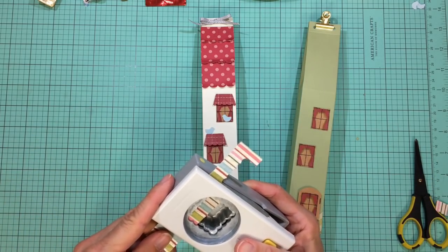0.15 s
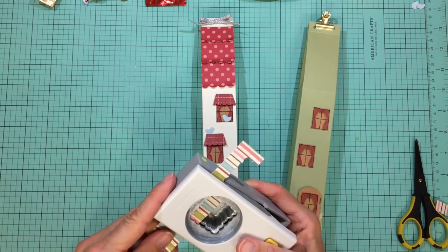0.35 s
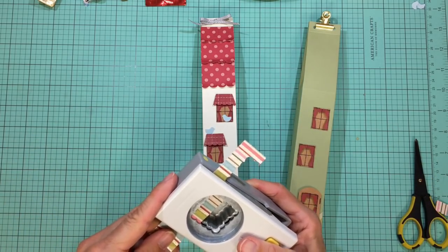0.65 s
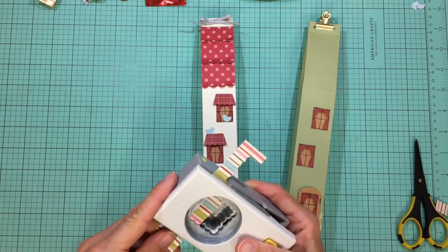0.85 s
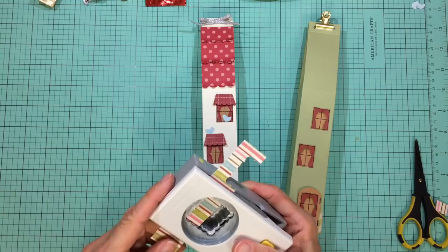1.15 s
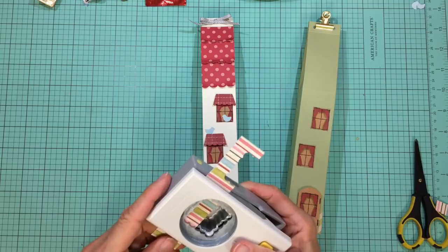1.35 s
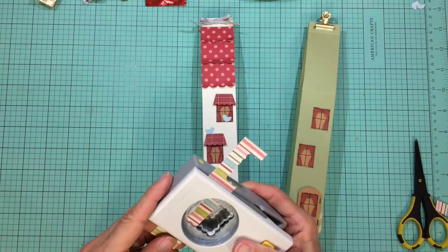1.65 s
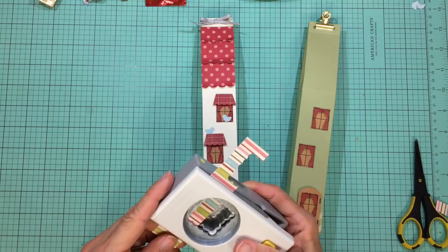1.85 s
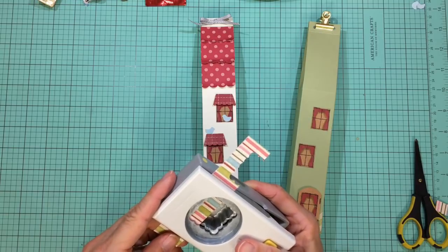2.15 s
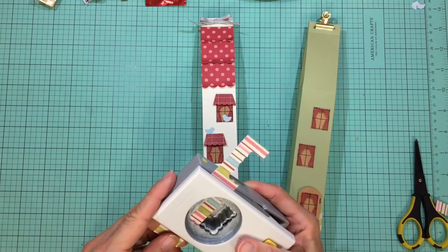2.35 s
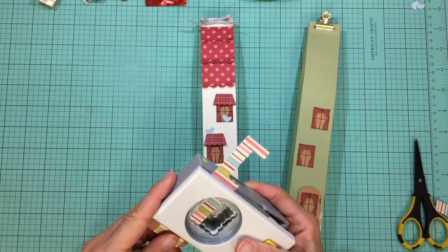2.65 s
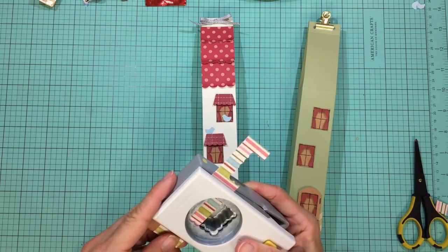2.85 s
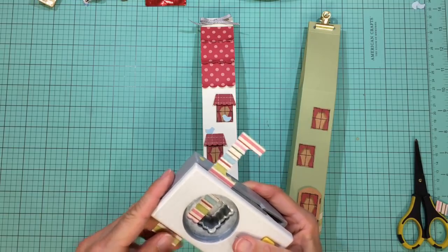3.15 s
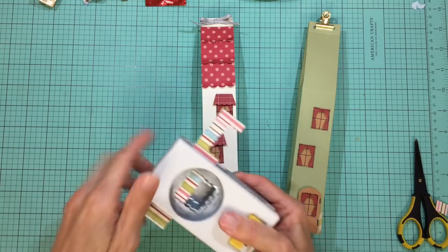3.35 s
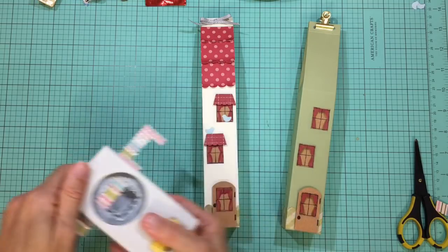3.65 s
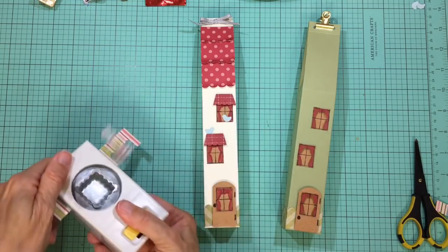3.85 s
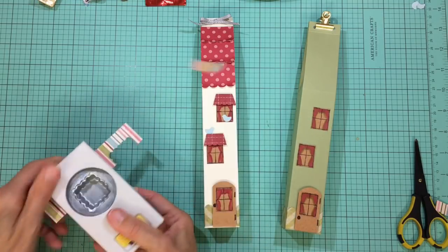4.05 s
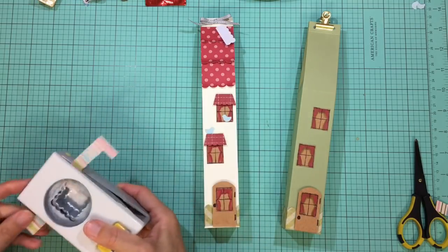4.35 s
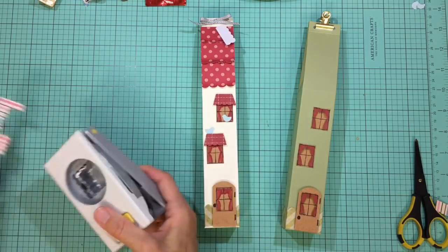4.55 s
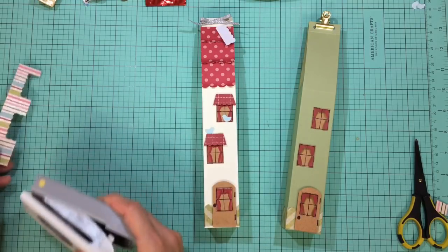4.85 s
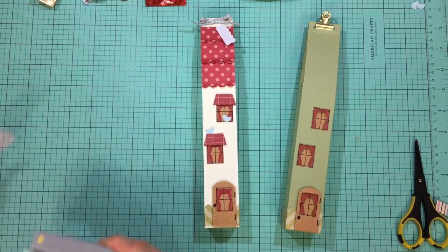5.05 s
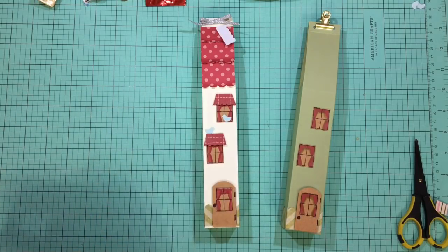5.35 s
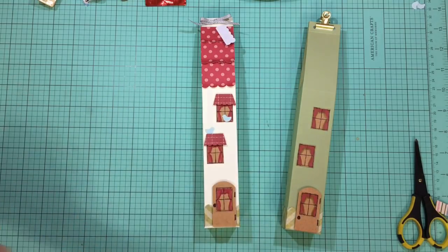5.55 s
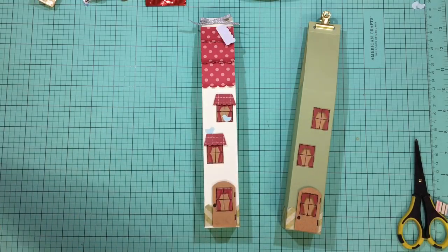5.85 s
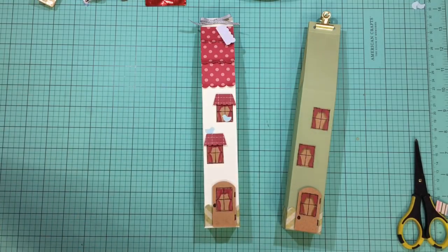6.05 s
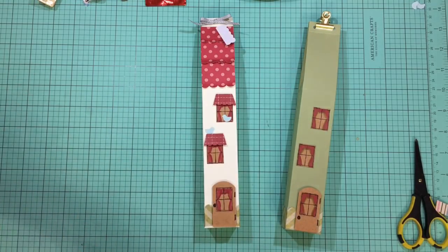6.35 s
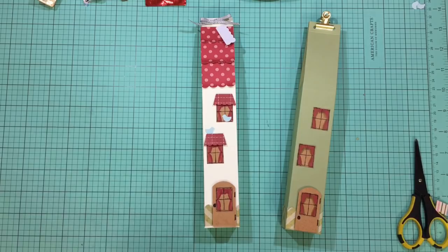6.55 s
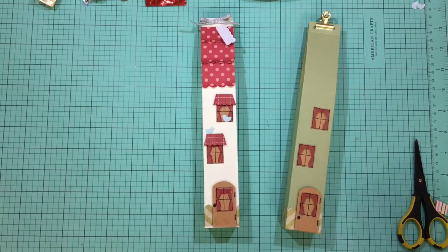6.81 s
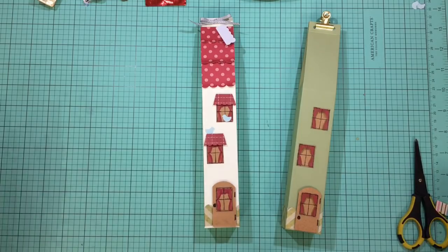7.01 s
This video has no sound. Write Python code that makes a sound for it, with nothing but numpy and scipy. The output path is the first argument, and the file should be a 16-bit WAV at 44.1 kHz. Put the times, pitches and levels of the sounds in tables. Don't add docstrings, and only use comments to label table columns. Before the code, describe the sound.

A craft punch rustles and creaks quietly in the hands, crunches and snaps sharply through card, then is set down with hollow wooden knocks.

```python
import sys
import numpy as np
from scipy import signal
from scipy.fft import rfft, irfft, next_fast_len
from scipy.io import wavfile
from scipy.ndimage import uniform_filter1d

SR = 44100
rng = np.random.default_rng(int(sys.argv[2]) if len(sys.argv) > 2 else 0)


def nominal_scale(level):
    x = np.asarray(level, float) / 20
    return 10 ** x


def transcribe(u):
    v = np.clip(np.atleast_2d(u).T, -1, 1)
    q = np.round(v * 32767).astype(np.int16)
    wavfile.write(sys.argv[1], SR, q)


N = 316505


# (pitch [Hz], level [dB])
AIR = [(12, -65), (20, -38), (36, -15.5), (60, 1), (82, -13), (117, -5.5), (244, -20.5), (297, -21),
       (566, -28), (690, -29), (1280, -31), (1390, -33), (2890, -35.5), (12500, -42.5), (16500, -47.5)]
# (pitch [Hz], rms level [dB])
WHINES = [(1248, -81), (1308, -81)]
# (pitch [Hz], width [Hz], rms level [dB])
DRONES = [(51.5, 6.1, -69.5), (119, 10, -71.5), (243.3, 35, -74)]
# (pitch [Hz], t60 [s])
ROOM_DECAY = [(150, 0.52), (600, 0.2), (2000, 0.23), (5000, 0.18), (12000, 0.17)]
# (delay [ms], level [dB])
ECHOES = [(2.1, -9.5), (4.4, 0), (6.3, -42), (8.3, -0.5), (11.5, -28.5), (16, -27), (23.5, -25)]

# (pitch [Hz], level [dB], t60 [s])
DEEP = [(110.4, -2, 0.37), (144.5, -1.5, 0.15)]
# (pitch [Hz], level [dB], t60 [s])
MIDDLE = [(182.7, -2.5, 0.1), (244, 2.5, 0.039)]
# (pitch [Hz], level [dB], t60 [s])
EDGE = [(358.3, -4, 0.051), (432.3, 0.5, 0.059)]
# (pitch [Hz], level [dB], t60 [s])
PANEL = [(702.5, 3, 0.083), (833, -12, .02), (927, 6, 0.039), (1050, -2, 0.049), (1110, 1, 0.04)]
# (pitch [Hz], level [dB], t60 [s])
RATTLE = [(1668, -7, 0.018), (1728, -3, 0.036), (1966, -3.5, .02), (2130, -3.5, .02), (2263, 5, .014),
          (2510, 0, 0.025), (2915, -1, 0.017), (3280, 0, .014), (3300, -30, .02)]
# (pitch [Hz], level [dB], t60 [s])
TICK = [(4495, -11.5, .012), (5320, -4, 0.013), (5900, -4, 0.0077), (6490, 0.5, 0.0064), (7200, 17, 0.0013),
        (9350, 4, .002), (11800, -11, .002)]
# (peak [s], rise [s], fall [s], level [dB])
SHAKES = [
    (4.0, 0.011, 0.025, -47.5),
    (4.072, 0.033, 0.052, -55),
    (4.269, 0.022, 0.21, -47.5),
    (6.4, 0.0048, 0.12, -46.5),
    (6.563, 0.16, 0.28, -44),
    (6.672, 0.19, 0.17, -49),
    (7.17, 0.053, 0.19, -64),
]
# (time [s], deep [dB], middle [dB], edge [dB], contact [ms])
THUMPS = [(5.537, -64.5, -48.5, -43.5, 1.2), (5.877, -45, -35, -41, 2), (5.8811, -20, -19, -25.5, 2.26),
          (5.97, -31, -36, -27.5, 1.9), (5.9734, -34, -20, -23.5, 1.33), (6.0204, -45, -47, -49, 2.3),
          (6.088, -49, -34.5, -55, 3), (6.146, -52, -60, -65, 3.2), (6.306, -37.5, -31.5, -37, 2.2),
          (6.3106, -41.5, -29, -33, 1.6), (6.3249, -48, -25.5, -30, 1.26), (6.392, -42, -30.5, -34, 1.6),
          (6.446, -51, -49, -42, 2), (6.479, -49, -33, -43.5, 1.35), (6.548, -46, -37.5, -49, 2.5),
          (6.605, -45, -40.5, -47, 2.2), (6.664, -42.5, -45.5, -52.5, 2.7), (6.966, -66, -66, -61, 2.6)]
# (time [s], panel [dB], rattle [dB], tick [dB], contact rise [ms])
KNOCKS = [(5.538, -36, -52, -76, 4), (5.879, -29.5, -40.5, -49, 2.96), (5.885, -34, -43.5, -62, 2.4),
          (5.972, -25, -30.5, -39, 1.14), (5.978, -31, -38.5, -65, 1.8), (6.0185, -25, -34, -36.5, 1.5),
          (6.027, -28.5, -32, -48, 4.16), (6.07, -33, -39, -58, 2.7), (6.09, -49, -44.5, -70, 2.7),
          (6.148, -58.5, -45, -55, 1.9), (6.306, -34.5, -40, -49.5, 1.1), (6.311, -36.5, -46, -63.5, 2.6),
          (6.3245, -22.5, -16.5, -24, .6), (6.332, -28.5, -36, -40, 2.3), (6.34, -33, -35, -57, 1.6),
          (6.394, -43, -60, -80, 1.9), (6.478, -47.5, -69.5, -87.5, 2.7), (6.549, -54.5, -75, -85, 2.8),
          (6.666, -59.5, -53.5, -80, 4.1), (6.965, -60.5, -62, -85, 2.2)]

# (pitch [Hz], level [dB], t60 [s])
CARD = [(850, -2, 0.065), (1000, 1, 0.044), (1280, 13, 0.016), (1650, 14, 0.012), (1950, 7.5, .02),
        (2200, 4, .014), (2650, -4, .009)]
# (time [s], card [dB], tick [dB], contact rise [ms])
OFFCUT = [
    (4.1664, -18, -32, 0.26),
    (4.1702, -25, -36, 0.23),
    (4.175, -43, -52, 1.5),
]

# (pitch [Hz], level [dB])
RUB_COLOURS = [
    [(850, -28.5), (1250, 5), (1480, 8), (1750, 3.5), (2080, 6.5), (2300, 1.5), (2600, -10), (3200, -43.5)],
    [(120, -25.5), (250, 4), (450, -8.5), (900, 4), (1300, -24.5)],
    [(2000, -32.5), (2800, 1), (3600, 3), (4600, -0.5), (6000, -29)],
    [(4200, -19.5), (5600, 3.5), (9000, -1.5), (13000, -9), (16000, -13.5)],
]
# (palm [dB], die [dB], hiss [dB])
RUB_SHARES = [
    (-30.5, -2.4, -0.5),
    (-2.5, -2.5, -6),
    (-4.5, -10, -3),
]
# (peak [s], rise [s], fall [s], shell [dB], die and hiss above shell [dB])
SLIDES = [(0.544, 0.059, 0.018, -68, -7), (0.949, 0.09, 0.072, -48, -11.5), (1.18, 0.11, 0.21, -68.5, 1.5),
          (1.228, 0.14, 0.043, -72, 1.5), (1.339, 0.02, 0.078, -52, -10.5),
          (1.364, 0.072, 0.069, -50, -11.5), (1.54, 0.17, 0.027, -69, -14), (3.222, 0.062, 0.048, -66.5, 4),
          (3.6, .005, 0.021, -72, -7), (3.68, 0.057, .005, -65, 1), (4.2, .03, 0.24, -66.5, 2.5),
          (3.9, .005, 0.31, -66, 5), (4.03, 0.21, .005, -73, -3), (4.27, .005, 0.068, -55, -4.5),
          (4.392, 0.12, 0.19, -64.5, 5.5), (4.452, 0.14, 0.031, -54, -3.5), (4.495, 0.013, 0.1, -49, 1),
          (4.52, 0.043, 0.023, -48, 5), (4.549, 0.055, 0.024, -57.5, 12), (5.406, 0.058, 0.14, -68, 4),
          (5.502, 0.034, 0.034, -70, 1), (6.675, 0.041, 0.17, -68, -6)]
# (peak [s], rise [s], fall [s], shell [dB], die and hiss above shell [dB])
PALMS = [(0.6, 0.09, .06, -78, -8), (1.957, 0.047, 0.19, -66, -10), (2.968, 0.063, 0.15, -71.5, -3.5),
         (4.067, 0.071, 0.29, -55, -0.5), (4.44, 0.47, 0.04, -65.5, -10), (4.545, 0.054, 0.051, -67, -9),
         (4.789, .005, 0.13, -58.5, 11.5), (4.861, 0.017, 0.17, -48.5, -1), (5.032, 0.14, 0.11, -62, -4.5),
         (5.072, 0.0085, 0.039, -56.5, 1.5), (5.564, 0.052, 0.11, -59, -12.5),
         (6.43, 0.0053, 0.13, -67.5, -2.5), (6.491, 0.085, 0.96, -72, -2), (6.966, 0.044, 0.21, -70.5, -8)]
# (peak [s], rise [s], fall [s], shell [dB], die and hiss above shell [dB])
BRUSHES = [(3.47, .1, .3, -79, 5.6), (3.56, .3, .3, -79.5, 12), (3.655, .05, .1, -75.5, 12),
           (3.79, .04, 0.22, -69.5, 11), (3.85, 0.22, .1, -76.5, 7.2), (5.14, 0.45, 0.07, -78.5, 10.5),
           (5.35, 0.0041, 0.035, -84, 14), (5.5, 0.22, .05, -71, 2.04), (5.7, 1, 0.31, -74, 1.15),
           (5.761, 0.024, 0.81, -69.5, 12.9), (5.865, 0.037, 0.014, -66, 11), (6.25, 0.18, 0.16, -78, 2.5)]

# (pitch factor, level [dB], t60 [s])
SHELL = [(1.023, 15, 0.024), (1.3, 5, .008), (1.2, -17, 0.0035)]
# (pitch factor, level [dB], t60 [s])
LEVER = [(1.3, -22.5, 0.049), (2.2, -11.5, 0.069), (.3, -13, 0.019)]
# (start [s], end [s])
LOADED = (3.4, 3.9)
# (pitch [Hz], level [dB], t60 [s])
DIE = [(3450, 2, 0.017), (3900, -12.5, 0.015), (4030, 13.5, 0.0042), (4370, -5, 0.0065)]
# (pitch [Hz], level [dB], t60 [s])
JAWS = [(3300, 0, .008), (3560, -7, .016), (3950, -5, .007), (4450, -4, .007), (4900, -8, .004)]
# (pitch [Hz], level [dB], t60 [s])
FIZZ = [(5950, -11, .004), (6900, -2.5, 0.0077), (7250, 2, 0.0086), (7800, 4.5, .004), (8620, 3.5, 0.01),
        (9240, 3.5, 0.0071), (11100, 0.5, 0.0058), (11820, 0, .004), (12200, -9.5, 0.0044),
        (13700, -4.5, .004), (14240, -7.5, .004)]
# (time [s], shell pitch [Hz])
GRIP = [
    (0.95, 1630),
    (1.34, 2150),
    (2.1, 1280),
    (4.26, 1315),
    (4.265, 1850),
    (4.5, 1630),
    (4.776, 2200),
    (4.784, 1330),
    (5.07, 1110),
]
# (time [s], die [dB], shell [dB], fizz [dB], contact rise [ms])
SNAPS = [(0.96, -62, -50, -59, 0.03), (0.9782, -43.5, -51, -44, 0.038), (0.999, -53, -65, -64, .3),
         (1.7994, -77, -82, -58, 0.061), (2.3087, -44, -71, -41, 0.13), (2.3881, -59, -64, -56, 0.093),
         (3.2904, -38, -46, -29.5, 0.04), (3.8026, -22.5, -30.5, -27, 0.46), (4.116, -60, -51, -42, 0.053),
         (4.2366, -43, -57, -36, 0.08), (4.2592, -40, -44, -37, 0.14), (4.292, -51, -60, -49, .3),
         (4.317, -49, -51, -47, 0.07), (4.768, -22.5, -43, -36, 0.09), (4.7702, -37, -43, -46, .3),
         (4.776, -21, -47, -23.5, 0.053), (4.778, -33, -58, -45, 0.14), (4.7856, -25.5, -49, -31.5, 0.34),
         (4.7882, -33, -59, -41.5, 0.18), (4.8634, -36, -44, -30, 0.4), (5.07, -41.5, -47.5, -69, 0.071),
         (5.2101, -64, -74, -49.5, 0.055)]
# (time [s], die [dB], shell [dB], fizz [dB], contact rise [ms])
CRUNCHES = [(0.946, -49, -38.5, -62, 4.2), (1.335, -50, -57, -54, 2.2), (2.1263, -78, -72, -81, 1.5),
            (3.49, -30, -26.5, -38, 1.74), (3.4945, -61, -20.5, -37.5, 0.62), (3.5033, -43, -61, -48, 1.5),
            (3.5782, -34, -31, -36, 2.1), (3.5828, -33.5, -49, -33, 0.67), (3.6834, -41, -35, -39, 2.4),
            (3.687, -36.5, -34.5, -38.5, 2.3), (3.7298, -38, -32.5, -39, 2.2),
            (3.751, -33.5, -33, -33.5, 2.6), (3.7991, -21.5, -32, -23.5, 0.44),
            (4.0498, -71, -45.5, -52, 1.62), (4.2398, -39, -34, -40, 0.51), (4.266, -47, -49, -38.5, 1.27),
            (4.4128, -49, -57, -43.5, 2.1), (4.4452, -44.5, -53, -55, 2.3), (4.485, -40.5, -37, -38.5, 3.1),
            (4.775, -28.5, -38.5, -42, 2.4), (4.8537, -33.5, -39, -29, 0.89), (4.858, -49, -35, -52, 1.66),
            (4.864, -37.5, -51, -35, 1)]
# (time [s], die [dB], shell [dB], fizz [dB], contact rise [ms])
CUT = [
    (3.549, -46, -48, -50, .6),
    (3.8346, -44, -40, -45, 1.2),
    (3.8646, -3, -19, -10, .08),
]
# (time [s], pitch [Hz], level [dB], t60 [s], contact rise [ms])
PATCHES = [(0.921, 5240, -52, .008, 2), (0.946, 5450, -51, .01, 3.7), (0.959, 1950, -37, .01, .5),
           (1.337, 5500, -65, .006, 1), (1.354, 2070, -42, 0.023, 2.4), (1.37, 2100, -50, .015, 2.3),
           (3.504, 1310, -35, .01, 0.7), (3.515, 1320, -48, 0.034, 1), (3.58, 6360, -35.5, 0.0087, 0.88),
           (3.581, 8530, -39, 0.0087, 0.83), (3.687, 4440, -39, .008, 1.2), (3.686, 7840, -59, .008, 1.4),
           (3.751, 7200, -41, .008, 2.5), (3.7991, 3860, -22.5, 0.012, 0.55), (3.798, 4600, -28, 0.012, .5),
           (3.7995, 2300, -36, .006, .5), (3.8646, 2040, -26, .008, 0.09), (3.867, 5240, -31, .012, .3),
           (4.2375, 2650, -38, 0.0073, 0.33), (4.241, 3200, -42, .006, .4), (4.415, 6800, -52, .006, 1),
           (4.444, 2110, -38.5, .01, 1.4), (4.476, 8160, -52, .006, 1), (4.51, 1670, -42, 0.013, 3.5),
           (4.546, 1130, -39.5, 0.0081, 0.83), (4.559, 6650, -48, .006, .8), (4.781, 1000, -47, 0.016, 1.9),
           (4.795, 5260, -38, .01, 1), (4.869, 1340, -45, .012, 1), (5.539, 818, -39.5, 0.072, 1.6),
           (5.539, 279, -42.5, 0.063, 1.8), (5.979, 695, -19, 0.044, 0.99),
           (5.973, 1210, -30.5, 0.064, 3.2), (6.088, 253, -38, .09, 3.3), (6.325, 1060, -17.5, 0.0066, .8),
           (6.668, 903, -53.5, 0.06, 2.1), (6.23, 2300, -63.5, .05, 8), (6.326, 1950, -27, 0.0087, 2),
           (6.338, 429, -34, .05, 1.8), (0.974, 1500, -43, .012, 2.5)]
# (time [s], pitch [Hz], level [dB], t60 [s],
# contact rise [ms])
SPOTS = [(0.541, 1600, -62, .02, 3), (2.125, 2000, -62, .015, 1), (2.3088, 2130, -55, 0.013, .15),
         (2.3101, 1420, -60, .008, .15), (2.3083, 2920, -48, .006, .15), (2.95, 3500, -65, 0.02, 3),
         (2.95, 1060, -66, .015, 3), (3.2912, 2050, -45.5, .008, .2), (3.2917, 3060, -50, 0.0092, .2),
         (3.661, 1350, -51.5, 0.039, 6), (3.504, 10700, -45, .006, 1), (3.549, 3200, -47, 0.0087, .5),
         (4.167, 2550, -28, .007, .2), (4.1694, 1280, -24, .011, .2), (4.167, 5570, -28.5, 0.0034, .2),
         (4.768, 3890, -30, .01, .3), (4.775, 4300, -32, .012, .3), (4.79, 3820, -35.5, .025, 2),
         (5.879, 2110, -45, 0.023, 1), (5.879, 1070, -38, .02, 1), (5.975, 1650, -35.5, .015, .6),
         (5.977, 442, -23.5, 0.074, 1), (6.018, 1130, -27, .04, 2.5), (6.0185, 2490, -35, .02, 1.5),
         (6.071, 1110, -43, .02, 1.5), (6.15, 840, -51.5, 0.025, 1.5), (6.15, 1708, -59, 0.048, 1.5),
         (6.305, 2200, -43, .015, 1), (6.3251, 1630, -17.5, .013, .5), (6.3248, 2170, -18.5, .011, .5),
         (6.3246, 3280, -18.5, .009, .5), (6.3245, 5320, -26.5, 0.018, .3), (6.3245, 5950, -23.5, .01, .3),
         (6.333, 3260, -33.5, .008, 1), (6.331, 5400, -32.5, .015, 1), (6.354, 4380, -49, .02, 6.2),
         (3.6869, 1344, -29.5, .022, 1.7), (3.686, 3310, -34, .01, 1.37), (3.7308, 1313, -28.5, .025, 1),
         (3.7306, 3600, -35.5, .012, 2.6)]


def evened(x):
    return x / np.sqrt(np.mean(x ** 2) + 1e-20)


def read(points, hz):
    f, value = np.transpose(points)
    return np.interp(np.log(hz + 1), np.log(f + 1), value)


def add(mix, s, sound):
    part = mix[round(s * SR):][:len(sound)]
    part += sound[:len(part)]


def colour(x, points):
    size = next_fast_len(len(x))
    gain = nominal_scale(read(points, np.fft.rfftfreq(size, 1 / SR)))
    return evened(irfft(rfft(x, size) * gain, size)[:len(x)])


def above(x, hz):
    return signal.sosfilt(signal.butter(4, hz, "high", fs=SR, output="sos"), x)


def ring(modes, blow, peak_db, pitch=1, spread=0.02, vary_db=1.8):
    longest = max(t60 for hz, db, t60 in modes)
    t = np.arange(int(SR * longest) + 58) / SR
    body = np.zeros(len(t))
    for hz, db, t60 in modes:
        share_db = vary_db * rng.standard_normal()
        detune = 1 + spread * rng.standard_normal()
        fade = nominal_scale(db + share_db - 60 * t / max(t60, .001))
        body += fade * np.sin(2 * np.pi * hz * pitch * detune * t)
    hz = pitch * np.array(modes)[:, 0]
    edges = [.7 * hz.min(), min(1.4 * hz.max(), .45 * SR)]
    band = signal.butter(3, edges, "band", fs=SR, output="sos")
    out = signal.sosfilt(band, signal.fftconvolve(body, blow))
    return nominal_scale(peak_db) * out / abs(out).max()


def chatter(ms):
    u = (np.arange(2048) + 1) / SR * 1000 / max(ms, .02)
    swell = u * np.exp(-u)
    slips = rng.standard_normal(len(u)) * swell
    for _ in range(4):
        z = rfft(slips, 4096)
        slips = irfft(z / (abs(z) + 1e-9), 4096)[:len(u)]
        slips *= np.minimum(1, swell / swell.max() * 4)
    return slips


def stroke(peak_s, rise_s, fall_s, db):
    t = np.arange(N // 32 + 2) * 32 / SR - peak_s
    return nominal_scale(db - 30 * np.maximum(-t / max(rise_s, .002), t / max(fall_s, .002))) ** 2


def widen(power, size):
    return uniform_filter1d(np.repeat(np.sqrt(power), 32)[:N], size)


def background():
    t, size = np.arange(N) / SR, next_fast_len(N)
    hz = np.fft.rfftfreq(size, 1 / SR)
    out = nominal_scale(-63.5) * colour(rng.standard_normal(N), AIR)
    for f, width, db in DRONES:
        narrow = rfft(rng.standard_normal(size)) / (1 + ((hz - f) / width) ** 2)
        out += nominal_scale(db) * evened(irfft(narrow, size)[:N])
    for f, db in WHINES:
        drift = 0.59 * evened(uniform_filter1d(rng.standard_normal(N), 4000))
        out += nominal_scale(db) * np.sqrt(2) * np.sin(2 * np.pi * f * t + drift)
    return out


def room(x):
    taps = np.zeros(SR // 2)
    at = np.arange(120, len(taps) - 20, 20)
    taps[at + rng.integers(0, 20, len(at))] = rng.choice([-1., 1.], len(at))
    hz, t, z = signal.stft(taps, SR, nperseg=128)
    fade = nominal_scale(-60 * t / read(ROOM_DECAY, hz)[:, None])
    tail = signal.istft(z * fade, SR, nperseg=128)[1]
    tail /= np.linalg.norm(tail)
    for k, (ms, db) in enumerate(ECHOES):
        tail[round(ms * SR / 1000)] += (-1) ** k * nominal_scale(db - 5.5)
    return signal.fftconvolve(x, tail)[:N]


def shaking():
    pushed = ring(DEEP + MIDDLE + EDGE, rng.standard_normal(N), 0)[:N]
    tremble = colour(pushed, [(30, -4), (60, 26), (110, 9.0), (300, 1.5)])
    return widen(sum(stroke(*row) for row in SHAKES), size=800) * tremble


def table_thumps():
    out = np.zeros(N)
    for s, *levels_db, ms in THUMPS:
        top = []
        for modes, level_db in zip([DEEP, MIDDLE, EDGE], levels_db):
            top += [(hz, db + level_db, t60) for hz, db, t60 in modes]
        push = np.hanning(int(ms * SR / 1000) + 3)
        add(out, s, ring(top, push, 1.5 + max(levels_db), spread=0.0031, vary_db=1.5))
    return out


def table_knocks():
    out = np.zeros(N)
    for s, *levels_db, ms in KNOCKS:
        blow = chatter(ms)
        for modes, db in zip([PANEL, RATTLE, TICK], levels_db):
            add(out, s, ring(modes, blow, db, spread=0.0065))
    return out


def falling_offcut():
    out = np.zeros(N)
    for s, card_db, tick_db, ms in OFFCUT:
        blow = chatter(ms)
        add(out, s, ring(CARD, blow, card_db, spread=0.0075))
        add(out, s, ring(DIE + FIZZ, blow, tick_db))
    return out


def rubbing():
    slips = rng.standard_normal(N) * nominal_scale(1.8 * np.minimum(rng.exponential(1, N), 4))
    clumps = nominal_scale(2.4 * evened(uniform_filter1d(rng.standard_normal(N), 130)))
    power = 0
    for rows, (palm_db, die_db, hiss_db) in zip([SLIDES, PALMS, BRUSHES], RUB_SHARES):
        for *gesture, dry_db in rows:
            shares_db = [[0], [palm_db], [die_db + dry_db], [hiss_db + dry_db]]
            power = power + stroke(*gesture) * nominal_scale(shares_db) ** 2
    parts = [widen(p, size=200) * colour(slips, points) for p, points in zip(power, RUB_COLOURS)]
    return clumps * sum(parts)


def ringing_patches():
    out = np.zeros(N)
    for s, hz, db, t60, ms in PATCHES + SPOTS:
        add(out, s, ring([(hz, 0, t60)], chatter(ms), db, spread=0))
    return out


def punch():
    out = np.zeros(N)
    for s, die_db, shell_db, fizz_db, ms in SNAPS + CRUNCHES + CUT:
        blow = chatter(ms)
        loaded = LOADED[0] < s < LOADED[1]
        if loaded:
            shell = SHELL + LEVER
        else:
            shell = [(factor, db, 0.97 * t60) for factor, db, t60 in SHELL]
        shell_hz = np.interp(s, *np.transpose(GRIP))
        add(out, s, ring(shell, blow, shell_db, shell_hz))
        die = JAWS if loaded and ms > .5 else DIE
        add(out, s, ring(die, blow, die_db))
        add(out, s, ring(FIZZ, blow, fizz_db, spread=0.04, vary_db=4))
    return out


def scene():
    near = punch() + ringing_patches() + rubbing()
    far = table_thumps() + table_knocks() + falling_offcut()
    echoes = room(nominal_scale(-11.5) * near + nominal_scale(-7.0) * above(far, 205))
    return (near + far + echoes + shaking() + background())[None]


def top_cut(x):
    return signal.sosfilt(signal.butter(12, 17030, fs=SR, output="sos"), x)


def record(dry):
    treble_cut = signal.butter(12, 15500, fs=SR, output="sos")
    dulled = signal.sosfilt(treble_cut, above(dry, 46))
    return top_cut(dulled)


dry = scene()
out = record(dry)
transcribe(out)
```